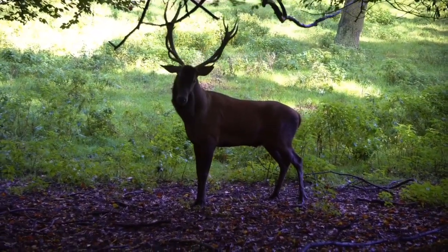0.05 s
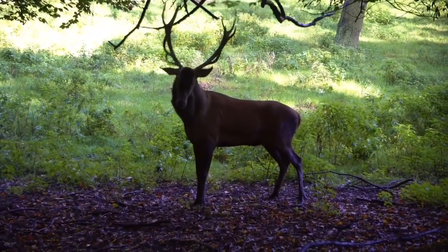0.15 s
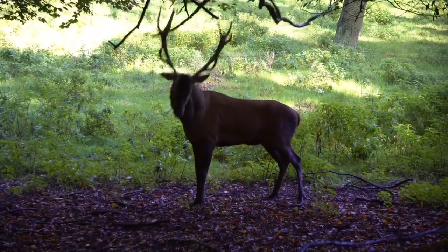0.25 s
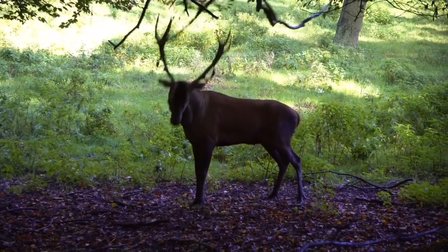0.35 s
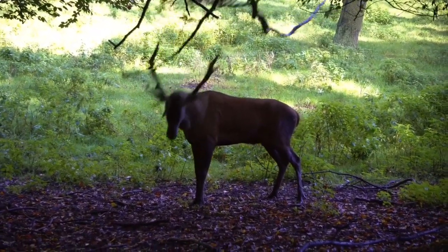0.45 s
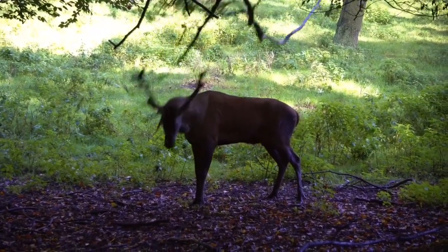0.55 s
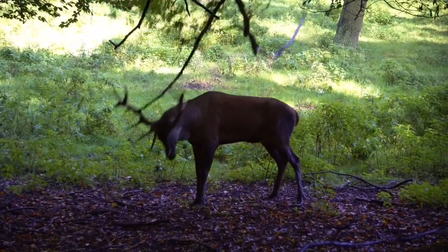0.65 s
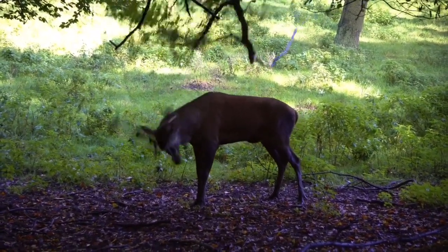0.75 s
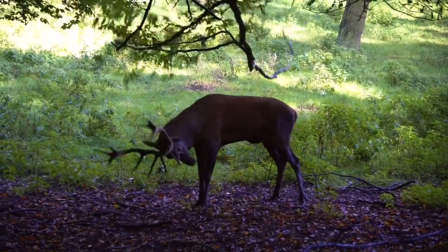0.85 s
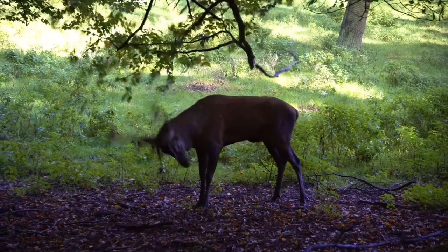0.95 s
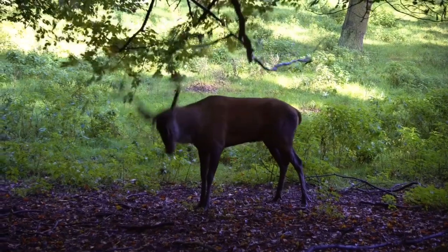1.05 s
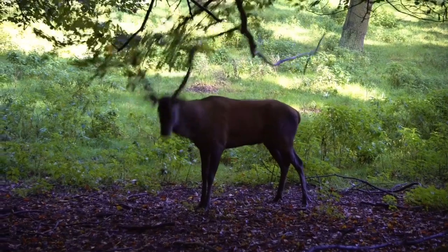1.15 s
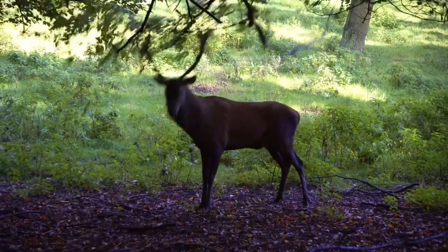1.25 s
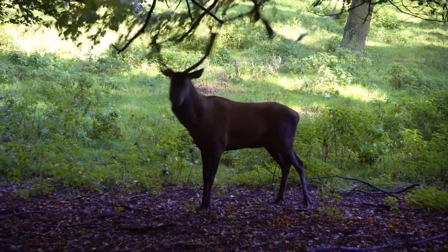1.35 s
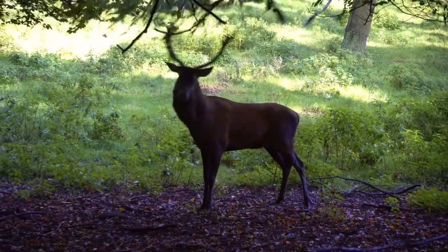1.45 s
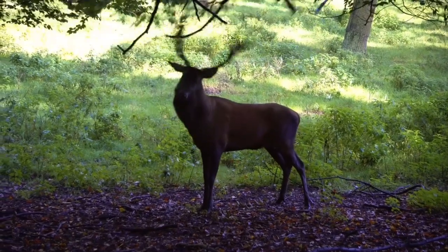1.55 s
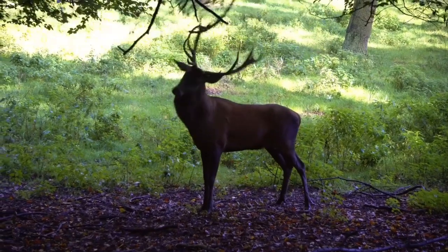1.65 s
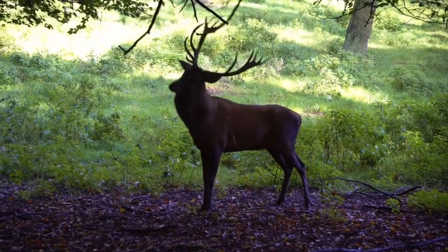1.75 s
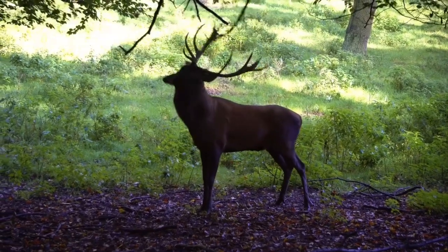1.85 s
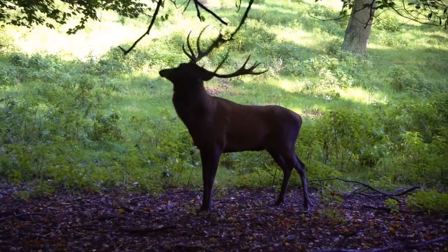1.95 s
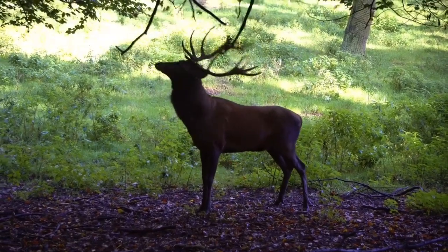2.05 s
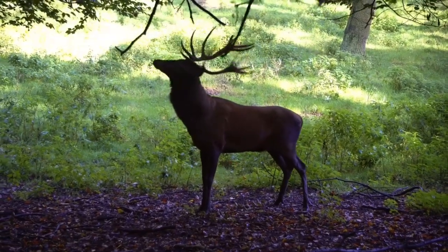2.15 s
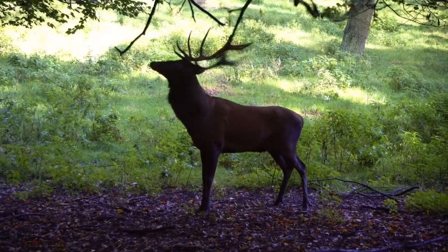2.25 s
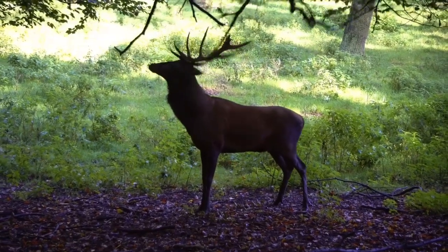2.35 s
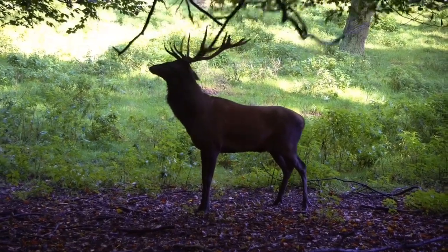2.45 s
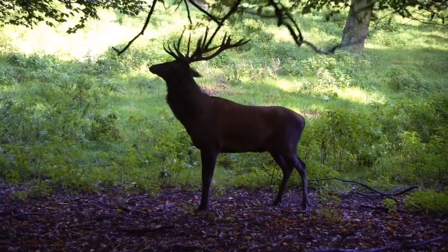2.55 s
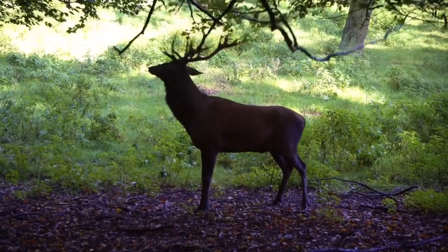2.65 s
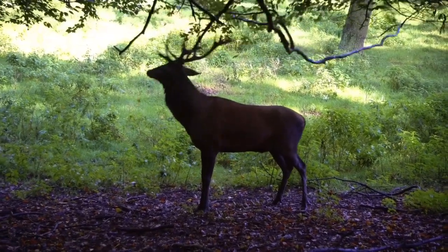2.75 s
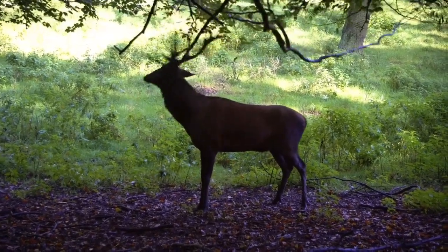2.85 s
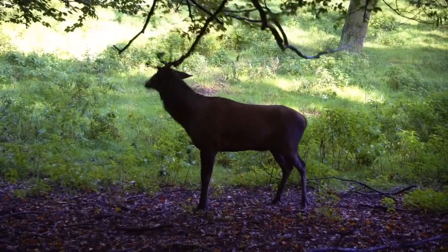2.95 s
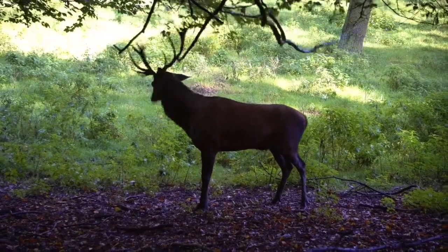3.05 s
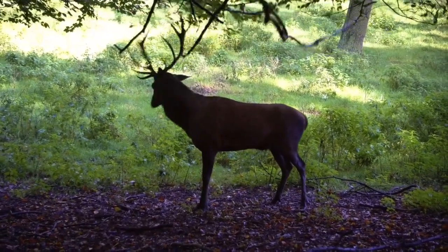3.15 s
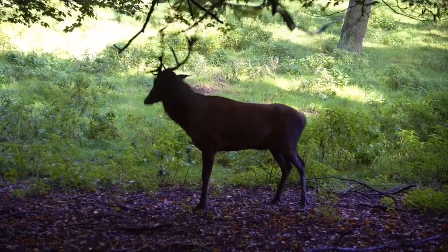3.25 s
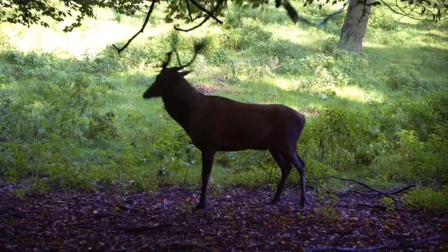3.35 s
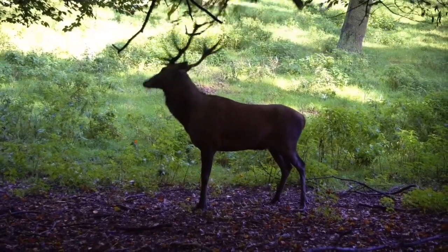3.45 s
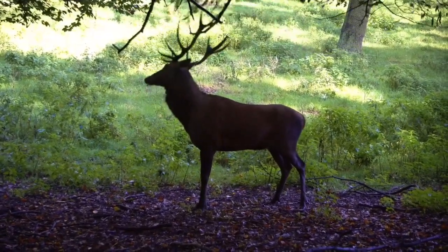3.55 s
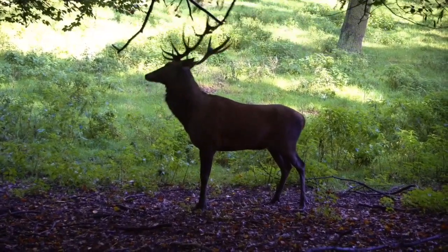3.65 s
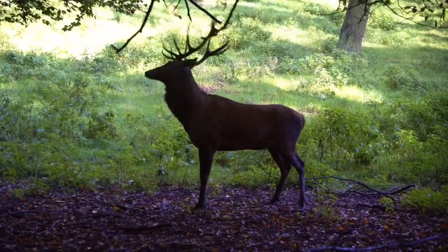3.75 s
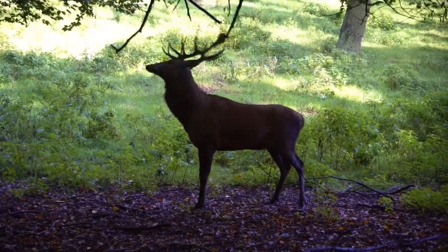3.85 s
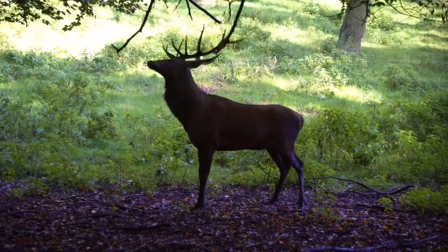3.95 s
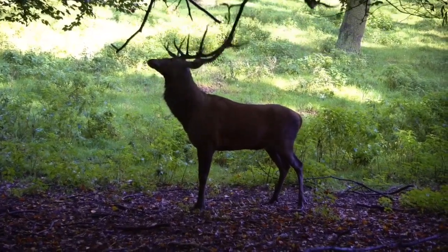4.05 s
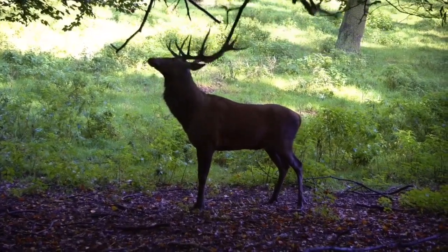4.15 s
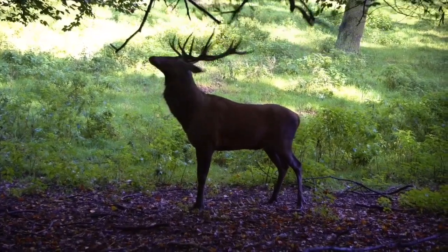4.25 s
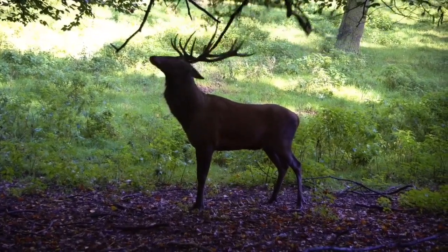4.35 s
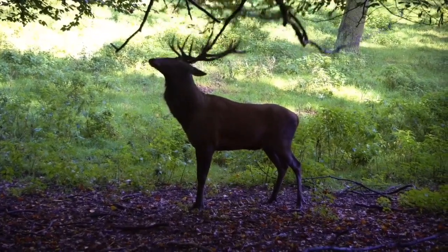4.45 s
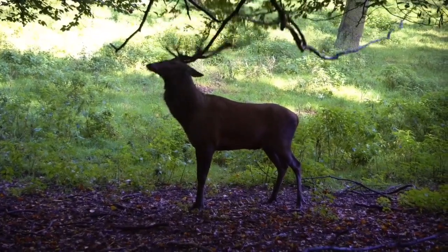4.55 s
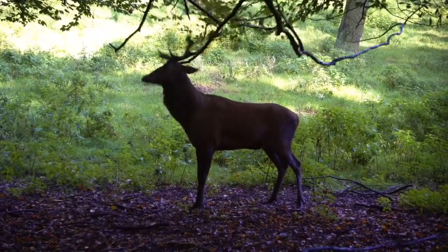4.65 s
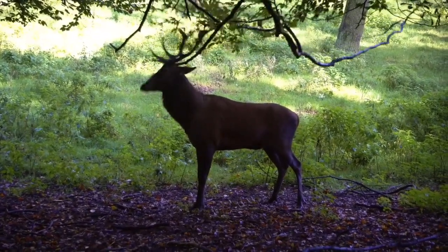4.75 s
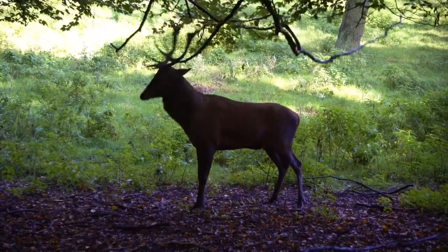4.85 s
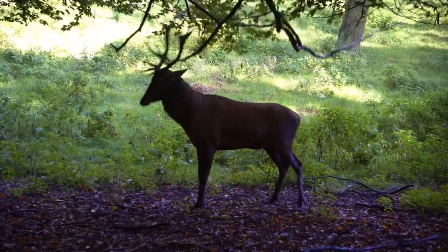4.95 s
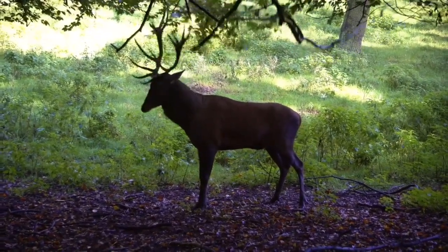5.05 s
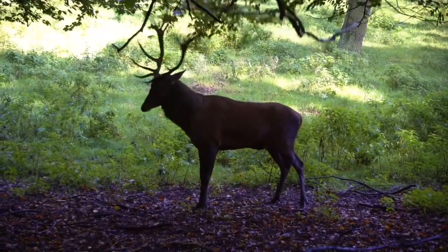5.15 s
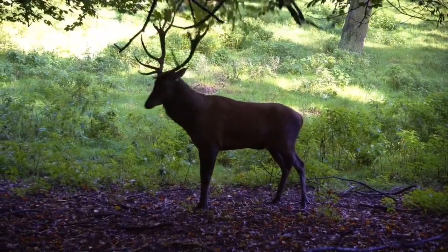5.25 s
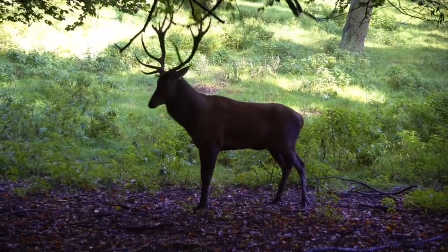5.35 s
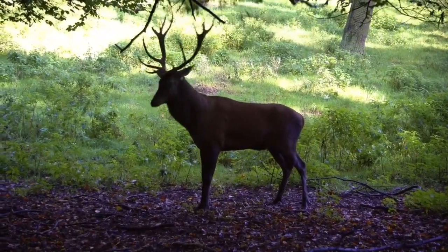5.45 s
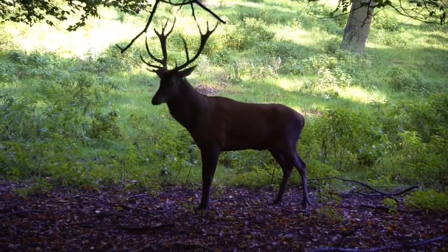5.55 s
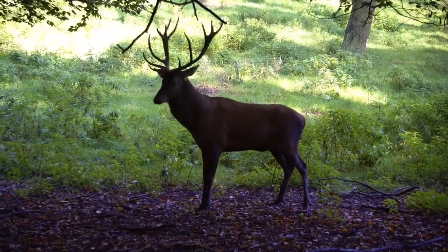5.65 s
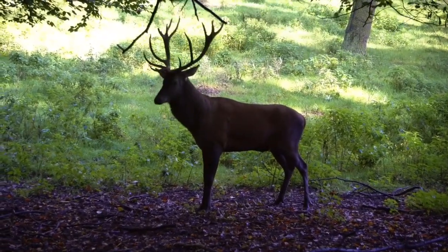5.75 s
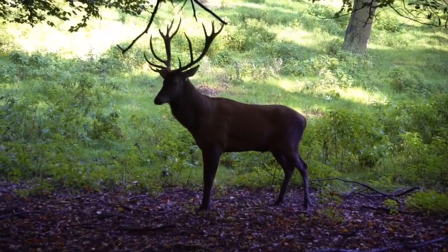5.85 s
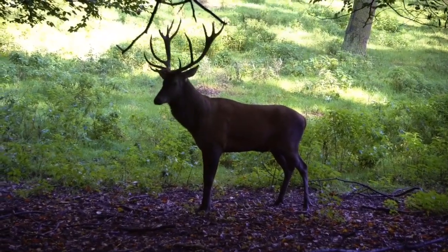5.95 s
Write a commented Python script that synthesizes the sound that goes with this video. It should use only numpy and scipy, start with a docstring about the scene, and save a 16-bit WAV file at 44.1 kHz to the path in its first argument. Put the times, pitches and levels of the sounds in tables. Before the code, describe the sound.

Antlers knock and rake a leafy branch in quiet woodland, with sharp wooden cracks, a brief tearing crunch and dry leaf rustle.

```python
"""Stag thrashing a bough

Edge of a quiet wood, microphones close to a stag working his antlers through a low leafy bough.
Knocks are gritty contact noise, a crack and ringing wood; the hardest one tears the green fibres.
Leaves, twigs and swishes are shaped trains of tiny contacts, and trunks scatter the knocks back.
Some way off to the left a small bird gives three gliding whistles, over a hush of filtered noise."""
import sys
import numpy as np
from scipy import signal
from scipy.fft import rfft, irfft
from scipy.io import wavfile
from scipy.ndimage import uniform_filter1d

SR = 44100
rng = np.random.default_rng(int(sys.argv[2]) if len(sys.argv) > 2 else 0)


def store_pcm(level_fs):
    """Save levels as 16-bit WAV."""
    pcm = np.round(np.clip(level_fs, -1, 1) * 32767).astype(np.int16)
    wavfile.write(sys.argv[1], SR, np.atleast_2d(pcm).T)


N = 264159  # length in samples

# Antler on wood. Each row: time in seconds, level in dB, brightness in Hz, contact time scale in seconds,
# ring of the bough in dB (relative), note of the struck spot in Hz, level of that note in dB.
ANTLER_KNOCKS = [ (0.431, -41, 960, 0.0048, 4, 1115, 7.5), (.664, -30, 1050, 0.0036, -5, 1226, 5),
                 (0.771, -45, 840, 0.0088, -2, 700, -10), (1.2027, -14.5, 1880, 0.0019, -20.5, 2965, 5.5),
                 (1.3488, -19, 1280, 0.0031, -11.5, 751, -2), (1.407, -38, 800, 0.006, -19, 730, 6),
                 (1.444, -39, 960, 0.0077, 10, 746, -1), (1.669, -47.5, 543, 0.009, 11, 379, -0.5),
                 (1.755, -43, 1090, 0.01, -19, 1510, -9), (1.847, -50.5, 865, 0.008, -10, 760, 8),
                 (2.33, -43.5, 845, 0.011, 7, 470, -14), (2.364, -39.5, 680, 0.021, 8, 510, -12),
                 (2.385, -32.5, 890, 0.0088, 1, 636, -1), (2.427, -32, 1270, 0.003, -4.5, 1100, 2.5),
                 (2.439, -40.5, 1110, 0.0049, 0, 990, 2), (2.570, -46, 1340, 0.0039, -8, 1500, -6),
                 (2.673, -43.5, 1700, 0.0042, -13, 1410, 7), (2.892, -48, 1370, 0.0069, 4, 780, -4),
                 (3.11, -47.5, 880, 0.0077, 1, 990, -10), (3.201, -43, 920, 0.013, -17, 793, 6),
                 (3.2934, -19.5, 1310, .0023, 1, 2350, -8), (3.320, -32.5, 600, 0.0071, 14, 516, -16),
                 (3.4142, -18, 1040, 0.0031, -2, 767, 5.5), (3.691, -46, 626, 0.0106, 8.5, 680, -5),
                 (4.278, -45, 1200, 0.0029, 3, 585, 2), (4.288, -49, 1250, .008, -7, 540, -8),
                 (4.304, -42.5, 740, .009, 9, 382, -8), (4.9862, -47.5, 2400, 0.0016, -8.5, 3440, 4),
                 (5.013, -47, 725, 0.0066, 5.5, 777, 8), (5.094, -48, 740, 0.0024, 4, 771, 8.5),
                 (5.107, -51, 760, .011, -1, 610, -8), (5.2513, -50, 1310, 0.0015, 0.5, 410, -9),
                 (5.2855, -28.5, 1750, .0016, -9, 614, -4.5), (5.3282, -49, 800, 0.0022, -22, 653, 10.5),
                 (5.5023, -31, 1565, 0.003, -10, 1685, 5)]
# Resonances of antler and bough. Each row: pitch in Hz, relative level in dB, t60 in seconds.
BOUGH_MODES = [(198.6, -25.5, 0.45), (257.5, -11.5, 0.23), (374.5, 4.5, 0.12), (480, 1.5, 0.065),
               (531.3, 7, 0.075), (602, 0, 0.093), (763, 11, 0.057), (907, -34.5, 0.12), (928, 1, 0.071),
               (1152, -5.5, 0.14), (1464, 3, 0.067), (1485, -3.5, 0.061), (1836, 4.5, 0.063),
               (2184, 0, 0.074)]
# Mostly sprays of leaves whipping past a tine; the sharpest short rows (3.412 s, 5.502 s) are twigs snapping.
# Each row: time in seconds, relative level in dB, rise in seconds, decay in seconds, low edge in Hz.
LEAF_SWISHES = [ (.430, -47, .003, 0.016, 3000), (.667, -41.5, .002, 0.0091, 4500),
                (.763, -38, .005, 0.022, 4500), (.941, -40, .002, 0.026, 1600),
                (1.354, -42, 0.014, .014, 4500), (1.736, -43, .003, 0.0096, 4500),
                (2.281, -33, 0.0012, 0.0053, 2620), (2.514, -42.5, .0045, 0.009, 3000),
                (2.718, -32, 0.0033, 0.011, 1660), (2.748, -31.5, 0.0095, 0.034, 1170),
                (3.23, -34, 0.019, .006, 1000), (3.312, -38.5, 0.0096, 0.021, 3500),
                (3.412, -25, .0004, 0.001, 3500), (3.899, -44.5, 0.017, 0.0097, 1470),
                (3.993, -45, .0005, 0.0057, 2000), (4.872, -46.5, 0.017, 0.0097, 1500),
                (5.110, -46.5, 0.02, 0.014, 2200), (5.502, -41, .0004, .002, 3000),
                (5.747, -47, 0.01, .06, 1700)]
# Colour of the leaves. Each row: frequency in Hz, relative level in dB per Hz.
LEAF_SPECTRUM = [(100, -52), (220, -35), (600, -2), (1500, -11), (3000, 1.5), (5000, 3), (7000, 0),
                 (10000, 1), (13000, -7), (15800, -23)]
# Colour of the dragging twigs. Each row: frequency in Hz, relative level in dB per Hz.
TWIG_SPECTRUM = [(100, -31), (250, -36), (400, -17.5), (800, -3.5), (1500, 5), (2300, 8.5), (3500, 7),
                 (5000, -0.5), (9000, 0.5)]
# Colour of the still woodland air. Each row: frequency in Hz, relative level in dB per Hz.
AIR_SPECTRUM = [(30, -27), (70, -29), (120, -22.5), (250, -8.5), (400, 0.5), (800, 1), (1500, -1.5),
                (3000, -14), (7000, -45), (15500, -16)]
# How alike a wide source reaches both microphones. Each row: frequency in Hz, left-right correlation.
STEREO_LIKENESS = [(100, 0.7), (400, 0.8), (1400, 0.46), (3000, 0.61), (5000, 0.25), (7500, 0.99),
                   (14000, 0.99)]
# Echo among the trunks. Each row: frequency in Hz, t60 of the late decay in seconds.
TRUNK_ECHO = [(200, 1.8), (600, 1.46), (1500, 1.11), (3000, 1.4), (8000, 1.25)]
# Bird calls, each a quick arch. Each row: start in seconds, length in seconds, nominal top pitch in Hz,
# relative level in dB.
BIRD_CALLS = [(3.139, .028, 6950, -44), (3.236, .026, 7250, -41), (3.326, .022, 6750, -43)]
# How hard the bough swings. Each row: time in seconds, relative rustle level in dB.
BOUGH_SWAY = [(0, -63), (.22, -68), (.4, -60.5), (.7, -54), (.83, -49.5), (1.03, -46), (1.17, -50),
              (1.45, -53.5), (1.78, -50.5), (2.05, -55), (2.48, -53), (3.06, -59), (3.3, -52.5),
              (3.65, -59.5), (4.3, -61.5), (5.05, -61.5), (5.28, -63), (5.6, -58), (5.99, -57.5)]

BELOW_OCT, ABOVE_OCT = 0.75, 0.72  # a knock's band reaches this far either side of its brightness
MIDDLE_HZ = 1000  # brightness at which a knock's echo has the plain ECHO_DB
ECHO_DB, ECHO_DB_PER_OCT = -8, 3.5  # bright cracks carry further among the trees
TEAR_S, TEAR_DB = 1.255, -33  # when the tearing peaks, and how loud
TEAR_RISE_S, TEAR_DECAY_S, TEAR_HZ = 0.024, 0.071, (1500, 3500)
FLUTTER_DB = 3  # leaves, relative to the swing
DRAG_DB = [[4.0], [5.0]]  # twigs at the left and right microphone, relative to the swing
SHAKE_DB, SETTLE_S = 9, 0.087  # a swish leaves the foliage trembling in proportion to its energy
TICKS_PER_S, TICK_SCATTER_DB = 45, 3.5
TICKS_DB, TICK_HZ, TICK_DECAY_S = -6, (700, 7000), 0.0026  # level relative to the swing
AIR_DB = -62.5
EDGE_HZ = 15900  # upper band limit at the microphones


def gain_of(db):
    """Decibels to amplitude."""
    return 10 ** (np.asarray(db) / 20)


def evened(x):
    """Scales to rms 1."""
    return x / np.sqrt(np.mean(x ** 2) + 1e-20)


def read(points, hz):
    """Reads a spectrum on a log-frequency axis."""
    f, value = np.transpose(points)
    return np.interp(np.log(hz + 1), np.log(f + 1), value)


def follow(curve):
    """A level curve as a gain for every sample."""
    return gain_of(np.interp(np.arange(N) / SR, *np.transpose(curve)))


def add(mix, s, sound):
    """Mixes a sound in at time s."""
    part = mix[..., max(round(s * SR), 0):][..., :sound.shape[-1]]
    part += sound[..., :part.shape[-1]]


def freqs(x):
    """The frequencies of the spectrum of x, kept just above zero."""
    return np.fft.rfftfreq(x.shape[-1], 1 / SR) + 1e-3


def colour(x, gains):
    """Filters x by one gain per frequency."""
    return irfft(rfft(x) * gains, x.shape[-1])


def band(hz, low_hz, high_hz, low_slope, high_slope):
    """Gain of a band with sloping skirts."""
    low_skirt = 1 + (low_hz / hz) ** (2 * low_slope)
    high_skirt = 1 + (hz / high_hz) ** (2 * high_slope)
    return (low_skirt * high_skirt) ** -.5


def spread(pair):
    """Turns two unrelated signals into left and right of a wide source."""
    same = np.clip(read(STEREO_LIKENESS, freqs(pair)), 0, 1)
    mid = colour(pair[0], np.sqrt(1 + same))
    side = colour(pair[1], np.sqrt(1 - same))
    return evened(np.array([mid + side, mid - side]))


def crackle(size, per_s, scatter_db):
    """Two trains of tiny contacts of uneven strength."""
    hit = rng.random((2, size)) < per_s / SR
    strength = gain_of(scatter_db * np.minimum(rng.exponential(1, (2, size)), 4))
    return evened(hit * strength * rng.choice([-1, 1], (2, size)))


def clumps(seconds, depth_db):
    """A wandering gain that gathers contacts into brief random clusters."""
    width = max(int(seconds * SR), 2)
    drift = uniform_filter1d(uniform_filter1d(rng.standard_normal(N), width), width)
    return gain_of(depth_db * evened(drift))


def antlers():
    """All knocks, slightly to the right, with their echo; brightness sets band and echo."""
    direct, sent = np.zeros(N), np.zeros(N)
    lead = .05  # seconds of room for the press before each blow
    for s, level_db, bright_hz, contact, ring_db, note_hz, note_db in ANTLER_KNOCKS:
        octaves = np.log2(bright_hz / MIDDLE_HZ)
        low_hz, high_hz = bright_hz / 2 ** BELOW_OCT, bright_hz * 2 ** ABOVE_OCT
        echo_db = ECHO_DB + ECHO_DB_PER_OCT * octaves
        blow, ringing = knock(level_db, low_hz, high_hz, contact, ring_db, note_hz, note_db, lead)
        add(direct, s - lead, blow + ringing)
        add(sent, s - lead, gain_of(echo_db) * (blow + .5 * ringing))  # the crack carries further
    # (Hz, dB taken from the left and given to the right)
    lean_db = read([(300, 0.24), (700, 0.61), (1400, 1.1), (2600, 2.9), (5000, 0.4)], freqs(direct))
    return colour(direct, gain_of([-lean_db, lean_db])) + trees(sent)


def knock(level_db, low_hz, high_hz, contact, ring_db, note_hz, note_db, lead):
    """A tine presses into bark, bites, and leaves the wood ringing: returns the blow and the ring."""
    t = np.arange(SR // 4) / SR - lead
    hz = freqs(t)
    grip = np.exp(-abs(t) / np.where(t < 0, 1.46 * contact, 1.4 * contact))
    grip += gain_of(-20.0) * (t > 0) * np.exp(-abs(t) / 0.042)  # the branch chatters on after the blow
    slips = grip * (crackle(len(t), 1800, 2)[0] + .3 * rng.standard_normal(len(t)))

    # the soft bark gives first, with a dull sound
    pressing = rfft(slips * (t < 0)) * band(hz, 1, .7 * high_hz, 2, 4)
    grit = pressing + rfft(slips * (t >= 0))
    grit /= np.sqrt(uniform_filter1d(abs(grit) ** 2, size=150))  # sharp contacts feed all pitches alike

    # the shorter the contact, the more of it is one clean crack
    bite = 2 * np.exp(-contact / 0.0033) * band(hz, low_hz, SR, 0.39, 2)
    # bending waves run slower at low pitch, which draws the crack out a little
    cycles = hz * (lead - .0004) + np.sqrt(hz / 450)
    force = grit + bite * np.exp(-2j * np.pi * cycles)
    force /= np.sqrt(uniform_filter1d(abs(force) ** 2, size=120))

    wood = band(hz, low_hz, high_hz, 2.77, 3.3) * band(hz, 224, SR, 5.2, 2)
    push = gain_of(-53) * band(hz, 80, 200, 1, 2)  # faint low shove
    blow = irfft(force * (wood + push), len(t))
    blow *= np.linalg.norm(grip) / np.linalg.norm(blow)

    after = np.maximum(t + 0.315 * contact, 0)  # the ring starts just ahead of the peak of the blow
    swell = 1 - np.exp(-after / (.5 * contact))
    ring = np.zeros(len(t))
    for f, db, t60 in BOUGH_MODES:
        mode = gain_of(db - 60 * after / t60) * np.sin(2 * np.pi * (f * after + rng.random()))
        ring += band(f, 1, high_hz, 2, 0.63) * mode  # dull blows excite the high modes less
    note_fade = gain_of(note_db - 60 * after * note_hz / 50)  # falls 60 dB in 50 cycles
    note = note_fade * np.sin(2 * np.pi * note_hz * after)
    ringing = swell * (gain_of(ring_db - 10.0) * ring + note)
    return gain_of(level_db) * blow, gain_of(level_db) * ringing


def trees(x):
    """Trunks and canopy scatter a sound back in many small echoes."""
    hz, t, z = signal.stft(spread(crackle(SR, 3000, 0.33)), SR, nperseg=256)
    late = gain_of(-60 * t / read(TRUNK_ECHO, hz)[:, None])
    early = 1 + np.exp(-t / 0.082)
    onset = 1 - np.exp(-t / 0.002)
    tail = signal.istft(z * late * early * onset, SR, nperseg=256)[1]
    return signal.fftconvolve(x[None], tail / np.linalg.norm(tail[0]), axes=1)[:, :N]


def tearing():
    """Green fibres give way one after another in a dense crunch."""
    t = np.arange(N) / SR - TEAR_S
    fibres = spread(crackle(N, 2500, 2.5))
    fibres = evened(colour(fibres, band(freqs(fibres), *TEAR_HZ, 3.5, 4.5)))
    swell = np.where(t < 0, np.exp(-(t / TEAR_RISE_S) ** 2 / 2), np.exp(-abs(t) / TEAR_DECAY_S))
    return gain_of(TEAR_DB) * swell * fibres


def foliage():
    """Leaves tick against each other thousands of times a second while twigs drag through them."""
    leaves = spread(crackle(N, 7000, 2.2)) * clumps(0.02, 0.2)
    twigs = spread(crackle(N, 2500, 1)) * clumps(0.008, 1.2)
    hz = freqs(leaves)
    # the twigs set their bough humming: peaks 14 Hz wide to either side
    bough = sum(gain_of(db) / np.hypot(1, (hz - f) / 14) for f, db, t60 in BOUGH_MODES)
    leaves = evened(colour(leaves, gain_of(read(LEAF_SPECTRUM, hz))))
    twigs = evened(colour(twigs, gain_of(read(TWIG_SPECTRUM, hz)) * (1 + 0.46 * bough)))
    swing = follow(BOUGH_SWAY)
    flutter = np.hypot(gain_of(FLUTTER_DB) * swing, trembling())
    return flutter * leaves + gain_of(DRAG_DB) * swing * twigs


def trembling():
    """The flutter that each swish leaves behind, as a gain for every sample."""
    t, power = np.arange(SR) / SR, np.zeros(N)
    for s, level_db, rise, decay, low_hz in LEAF_SWISHES:
        shake = gain_of(level_db + SHAKE_DB) * np.exp(-t / SETTLE_S)
        add(power, s, (rise + decay) * shake ** 2)
    return np.sqrt(power)


def flicks():
    """Single stiff twigs flick in the rustle, each a short decaying tick of noise."""
    t = np.arange(SR // 40) / SR
    tick = rng.standard_normal(len(t)) * np.exp(-t / TICK_DECAY_S)
    contacts = spread(crackle(N, TICKS_PER_S, TICK_SCATTER_DB))
    ticks = signal.oaconvolve(contacts, tick[None], axes=1)[:, :N]
    ticks = evened(colour(ticks, band(freqs(ticks), *TICK_HZ, 2.2, 1)))
    return gain_of(TICKS_DB) * follow(BOUGH_SWAY) * ticks


def swishes():
    """Sudden bursts of leaf contacts that die away."""
    out, lead = np.zeros((2, N)), .06  # lead: seconds of room for the rise
    t = np.arange(SR // 3) / SR - lead
    for s, level_db, rise, decay, low_hz in LEAF_SWISHES:
        burst = spread(crackle(len(t), 8000, 4.1))
        burst = evened(colour(burst, band(freqs(t), low_hz, 3900, 5.8, 0.81)))
        swell = np.exp(-abs(t) / np.where(t < 0, rise, decay))
        add(out, s - lead, gain_of(level_db - 0.5) * burst * swell)
    return out


def bird():
    """Thin whistles that shoot up and slide down, some way off to the left, with their echo."""
    out = np.zeros(N)
    for s, length, top_hz, level_db in BIRD_CALLS:
        u = np.linspace(0, 1, int(length * SR))
        hz = top_hz * np.interp(u, [0, .38, 1], [.78, 1.01, .78])
        whistle = signal.windows.tukey(len(u), .5) * np.sin(2 * np.pi * np.cumsum(hz) / SR)
        add(out, s, gain_of(level_db) * whistle)
    # weaker and one sample later on the right
    direct = np.array([gain_of(5.0) * out, gain_of(1.0) * np.roll(out, 1)])
    return direct + gain_of(-1.0) * trees(out)


def air():
    """The faint steady hush of the wood, from all around: wide filtered noise."""
    hush = spread(rng.standard_normal((2, N))) + 0.9 * rng.standard_normal((2, N))
    return gain_of(AIR_DB) * evened(colour(hush, gain_of(read(AIR_SPECTRUM, freqs(hush)))))


def scene():
    """The stag at his bough, the bird and the still air."""
    return antlers() + tearing() + foliage() + flicks() + swishes() + bird() + air()


def record(dry):
    """Two close microphone ports, thin in the deep bass, the left a shade early; then the band limit."""
    hz = freqs(dry)
    # (Hz, radians): the left phase leads and the right lags by this much
    turn = read([(100, 0.022), (600, 0.079), (2500, 0.031), (5000, 0.37), (8000, 0.12)], hz)
    bass = gain_of(read([(40, -6), (100, 2.5), (200, -1)], hz))  # (Hz, dB)
    ports = colour(dry, bass * np.exp(1j * np.array([turn, -turn])))
    limit = signal.firwin(511, EDGE_HZ, window=("kaiser", 9), fs=SR)
    return signal.oaconvolve(ports, limit[None], "same")


dry = scene()
out = record(dry)
store_pcm(out)
```